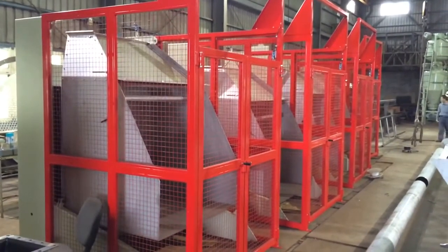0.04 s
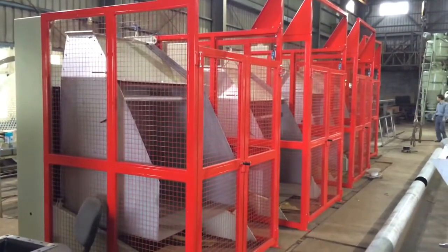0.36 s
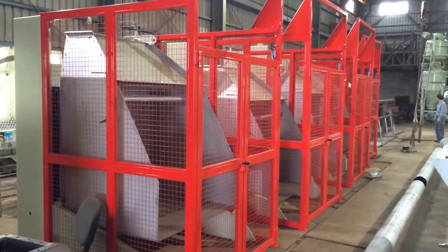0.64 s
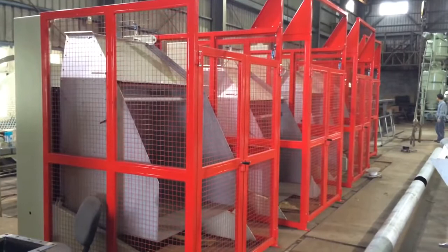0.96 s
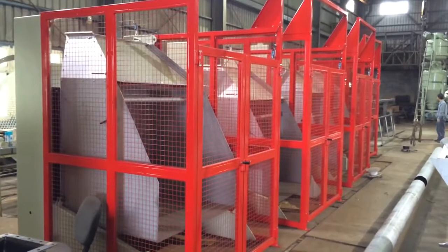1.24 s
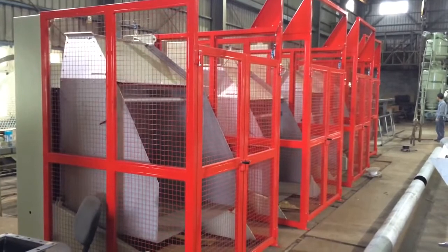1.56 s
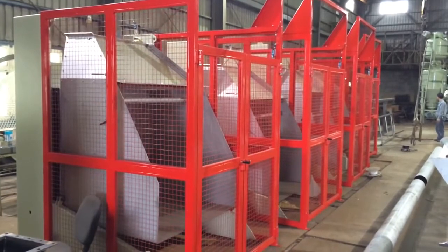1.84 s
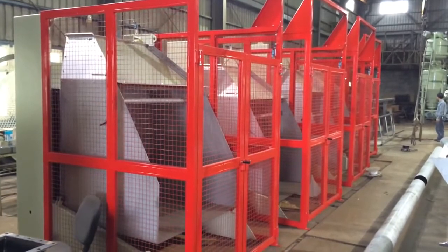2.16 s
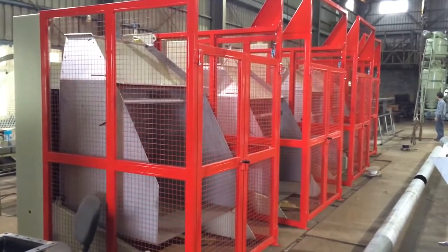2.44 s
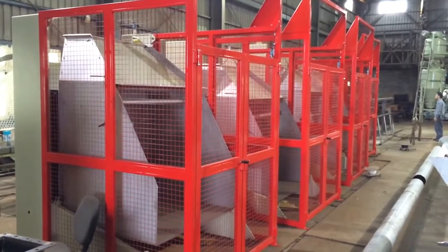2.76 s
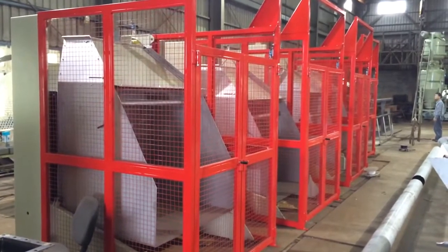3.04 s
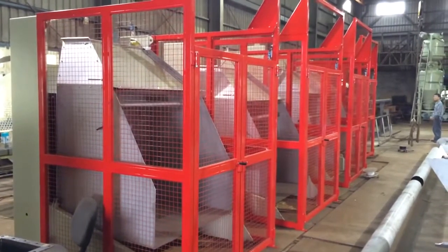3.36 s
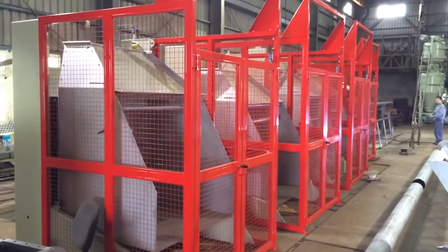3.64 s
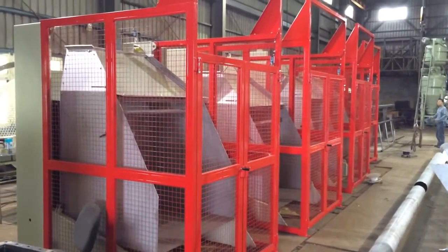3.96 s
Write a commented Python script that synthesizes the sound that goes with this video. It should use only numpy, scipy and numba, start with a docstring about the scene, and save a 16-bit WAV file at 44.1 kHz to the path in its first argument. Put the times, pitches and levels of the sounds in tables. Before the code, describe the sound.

Heavy bangs on a sheet-steel machine casing land right at the start, then at about 1.3, 2.4, 3.1 and 3.9 seconds, each ringing and echoing through a large factory hall. A thin metal ring swells near 0.5 seconds, and a lighter knock follows at 0.7. Beneath, a faint plant hum ducks with each blow and swells back, while a low drone comes and goes.

```python
"""Heavy blows strike the sheet-steel casing of a caged machine and ring through a large factory hall. A brief
low thump opens each blow, and each impact excites the casing's normal modes; reverberation prolongs the sound,
the treble dying first. A lighter knock, two ticks and thin metal rings fall between the blows, over the hum of
the plant and an intermittent low drone. An automatic gain control compresses each blow, so the hum ducks and
swells back."""
import sys
import numpy as np
from scipy import signal
from scipy.fft import rfft, irfft
from scipy.io import wavfile
from scipy.ndimage import uniform_filter1d
from numba import njit

SR = 44100
rng = np.random.default_rng(int(sys.argv[2]) if len(sys.argv) > 2 else 0)


def int16_out(signal):
    """Quantize to a 16-bit WAV file."""
    q = np.round(np.clip(np.atleast_2d(signal).T, -1, 1) * 32767)
    wavfile.write(sys.argv[1], SR, q.astype(np.int16))


N = 176400

# Levels in the tables are relative; sigma is the standard deviation of a Gaussian envelope.
# Blows on the casing: t/s, level/dB, spectral tilt/(dB per octave), thump level/dB
BLOW_EVENTS = [(-.045, 1.5, -0.5, -22), (1.3209, -1.5, 0.34, -10), (2.3852, 1, -0.1, -3.5),
               (3.095, 2, -0.5, -5), (3.8614, -0.5, -0.4, -36)]
# Strong normal modes of the casing: f/Hz, level/dB, T60/s
CASING_MODES = [(317, -27.5, 2.2), (397.4, -23, 1.95), (744, -23.5, 2.4), (950, -19.5, 1.9),
                (1127, -18.5, 1.3), (1155, -17, 2.46), (1233, -20.5, 1.87), (1323, -12.5, 2.06),
                (1427, -19.5, 1.3), (1457, -21.5, 2.5), (1525, -12.5, 1.9), (1605, -7, 0.24),
                (1590, -15.5, 2), (1690, -25, 1.8), (1913, -19, 2.9), (2066, -23, 1.1), (2231, -15, 2.43),
                (2302, -14.5, 1.6), (2355, -19, 2.7), (2730, -22.5, 2.2), (3200, -16, 1.5),
                (3680, -23.5, 2.54), (3890, -19.5, 1.4), (4560, -11.5, 0.36), (4870, -15, 0.8)]
# Spectral density of a blow's crash: f/Hz, level/dB
BLOW_SPECTRUM = [(60, -52), (150, -20.5), (300, -16), (480, -15), (600, -6.5), (900, -5.5), (1300, 0),
                 (1800, -1), (2450, 1), (3000, -1), (3450, -2.5), (3850, 0.5), (4800, -2.5), (5600, -4),
                 (6500, -5), (9500, -12.5), (15000, -20.5)]
# Spectral density of a blow's bright direct sound: f/Hz, level/dB
BITE_SPECTRUM = [(1500, -37), (3400, -14), (4650, 3.5), (5800, -6), (9000, -15), (15000, -19)]
# Partials of the brief low thump at the start of each blow: f/Hz, level/dB, lag/s, sigma/s
THUMP_PARTIALS = [(64, -12.5, 0.018, 0.011), (99, -7.5, 0.021, 0.0066), (192, -6.5, 0.011, 0.0063),
                  (293, -7.5, 0.018, 0.0029), (436, -6, 0.01, 0.0046), (575, -3.5, 0.0063, 0.0068)]
# Reverberation time of the hall: f/Hz, T60/s
HALL_DECAY = [(150, 5), (600, 2.11), (1300, 2.09), (2500, 1.95), (4500, 1.36), (7500, 0.96), (11000, 0.67),
              (15000, 0.27)]
# The knock and the two ticks: t/s, level/dB, spectral tilt/(dB per octave)
KNOCK_EVENTS = [(0.7443, -21.5, -0.5), (.99, -61, 4.5), (2.962, -45.5, 3)]
# Spectral density of a knock: f/Hz, level/dB
KNOCK_SPECTRUM = [(100, -21), (500, 0), (1100, 8), (2000, 1.5), (3200, 0), (4400, 4.5), (6000, -0.5),
                  (10000, -7), (15000, -9.5)]
# Thin rings of metal: peak t/s, sigma/s, f/Hz, level/dB
RING_SWELLS = [(0.51, .06, 2400, -15.5), (0.78, 0.16, 2624, -28), (0.51, 0.087, 1700, -20),
               (0.506, 0.064, 744, -23.5)]
# Swells of the low drone: peak t/s, sigma/s, f/Hz, level/dB
DRONE_SWELLS = [(0.29, 0.069, 268, -22.5), (0.932, 0.015, 213, -28), (0.987, .018, 214, -25.5),
                (1.046, 0.017, 214.2, -27), (1.167, 0.018, 205, -23), (1.26, .035, 210, -39),
                (2.05, 0.15, 183, -41.5), (3.72, 0.14, 215.7, -36), (3.98, .03, 185.6, -31.5)]
# Line spectrum of the plant's hum: f/Hz, level/dB
HUM_LINES = [(97, -47.5), (400, -55), (1166, -56), (1254, -42), (1326, -45)]
# Spectral density of the plant's rush: f/Hz, level/dB
RUSH_SPECTRUM = [(25, -24), (60, -2), (110, -5), (190, 8.5), (300, -5.5), (650, 2.5), (950, 1),
                 (1250, -1.5), (2400, -3), (4500, -8.5), (7500, -22), (11000, -35), (15000, -41)]


def blows(t, plate_gain):
    """Each blow superposes modal ringing, a crash and a bright bite, with a brief low thump at its start."""
    out = 0
    for start, db, tilt_db, thump_db in BLOW_EVENTS:
        age = t - start
        ring = undb(-3.5) * casing_ring(t, age)
        body = undb(-2.5) * crash(age, BLOW_SPECTRUM, tilt_db, plate_gain,
                                  rise_s=0.0019, hold_s=0.14, early_db=-15, early_s=0.005)
        bite = undb(-6.5) * direct_bite(age)
        out += (age >= 0) * (undb(db) * (ring + body + bite) + undb(thump_db) * low_thump(age))
    return out


def casing_ring(t, age, echo_db=-6.5, echo_lag_s=0.19, echo_sigma_s=0.03):
    """Damped normal modes decay exponentially; reflection from the far walls returns them as a swell."""
    decay_s = decay_time(np.maximum(age, 0), hold_s=0.051)
    ring = sum(undb(db) * wavering_tone(t, hz, width_hz=6, scatter=1.6) * undb(-60 * decay_s / t60)
               for hz, db, t60 in CASING_MODES)
    return ring * (1 + undb(echo_db) * gaussian(age, echo_lag_s, echo_sigma_s))


def crash(age, colour, tilt_db, plate_gain, rise_s, hold_s, early_db, early_s):
    """Overlapping modes of struck steel merge into noise; each band decays at the hall's T60."""
    hz, elapsed = bin_frequencies(), np.maximum(age, 0)
    tilt = undb(tilt_db * np.log2(hz / 2500))
    shape = unit_rms(plate_gain * undb(read_curve(colour, hz))) * tilt
    spectrum = rfft(rng.standard_normal(N)) * shape
    centres_hz = np.geomspace(100, 16000, 18)
    decay_s = decay_time(elapsed, hold_s)
    tail = 0
    for centre, weights in zip(centres_hz, np.eye(len(centres_hz))):
        band = irfft(spectrum * np.interp(hz, centres_hz, weights), N)
        tail += band * undb(-60 * decay_s / read_curve(HALL_DECAY, centre))
    attack = 1 - np.exp(-elapsed / rise_s)
    direct_boost = 1 + undb(early_db) * np.exp(-elapsed / early_s)
    return tail * attack * direct_boost


def plate_response(depth_db=2, spacing_hz=26):
    """Many weak plate resonances ripple the frequency response that all the impacts share."""
    ripple = rng.standard_normal(N // 8)
    return undb(depth_db * np.interp(bin_frequencies() / spacing_hz, np.arange(len(ripple)), ripple))


def direct_bite(age, tau_s=0.055):
    """The direct sound of an impact is a broadband transient, bright and exponentially damped."""
    return noise(BITE_SPECTRUM) * np.exp(-np.maximum(age, 0) / tau_s)


def low_thump(age):
    """Staggered wave packets sum to a brief low thump at the start of each blow, falling in pitch."""
    return sum(undb(db) * gaussian(age, lag, sigma) * np.sin(2 * np.pi * (hz * age + rng.random()))
               for hz, db, lag, sigma in THUMP_PARTIALS)


def knocks(t, plate_gain, clack_hz=1330):
    """Lighter metal contacts radiate a dry wave packet, the clack, and a short reverberant crash."""
    out = 0
    for start, db, tilt_db in KNOCK_EVENTS:
        age = t - start
        clack = gaussian(age, peak_s=0.0053, sigma_s=0.001) * np.sin(2 * np.pi * clack_hz * age)
        body = crash(age, KNOCK_SPECTRUM, tilt_db, plate_gain,
                     rise_s=0.0032, hold_s=0.016, early_db=2.5, early_s=0.03)
        out += undb(db) * (body + undb(10.5) * clack)
    return out


def metal_rings(t):
    """Narrow resonances of metal sound as thin tones that swell and fade."""
    return swells(t, RING_SWELLS, width_hz=22, scatter=1.2)


def drone(t):
    """Amplitude modulation: a low narrow-band drone comes and goes."""
    return swells(t, DRONE_SWELLS, width_hz=20, scatter=0.42)


def plant(t):
    """Stationary factory noise: a continuous spectrum, the rush, under a line spectrum, the hum."""
    rush = undb(-35.5) * noise(RUSH_SPECTRUM)
    hum = sum(undb(db) * wavering_tone(t, hz, width_hz=3, scatter=0.38) for hz, db in HUM_LINES)
    return rush + hum


def swells(t, table, width_hz, scatter):
    """Superposition of wavering tones under Gaussian envelopes."""
    return sum(undb(db) * gaussian(t, peak, sigma) * wavering_tone(t, hz, width_hz, scatter)
               for peak, sigma, hz, db in table)


def wavering_tone(t, hz, width_hz, scatter):
    """Interference of reflections makes a sinusoid waver in amplitude and phase."""
    in_phase, quadrature = (scatter * np.interp(t * width_hz * 4, np.arange(1024), draws)
                            for draws in rng.standard_normal((2, 1024)))
    phase = 2 * np.pi * (hz * t + rng.random())
    return ((1 + in_phase) * np.cos(phase) + quadrature * np.sin(phase)) / np.hypot(1, scatter)


def decay_time(elapsed, hold_s, knee_s=0.02):
    """Time spent in reverberant decay, which is held back while the reflections build up."""
    return knee_s * (np.logaddexp(0, (elapsed - hold_s) / knee_s) - np.logaddexp(0, -hold_s / knee_s))


def noise(colour):
    """White noise filtered to a given spectral shape, rms 1."""
    return unit_rms(irfft(rfft(rng.standard_normal(N)) * undb(read_curve(colour, bin_frequencies())), N))


def gaussian(t, peak_s, sigma_s):
    """Bell-shaped envelope of height 1."""
    return np.exp(-0.5 * ((t - peak_s) / sigma_s) ** 2)


def read_curve(table, hz):
    """Interpolation of (f/Hz, value) points on a logarithmic frequency axis."""
    points_hz, values = np.array(table, float).T
    return np.interp(np.log(hz), np.log(points_hz), values)


def bin_frequencies():
    """Frequencies of an N-point spectrum, floored at 1 Hz."""
    return np.maximum(np.arange(N // 2 + 1) * SR / N, 1)


def unit_rms(x):
    """Normalisation to rms 1."""
    return x / np.sqrt(np.mean(x ** 2))


def undb(db):
    """Decibels to amplitude ratio."""
    return 10 ** (np.asarray(db) / 20)


@njit
def peak_envelope(level, release_s):
    """Peak detection: the envelope rises at once and relaxes exponentially."""
    out, held = np.empty(len(level)), 0.
    for i in range(len(level)):
        held = max(level[i], held + (level[i] - held) / (release_s * SR))
        out[i] = held
    return out


def scene():
    """Linear superposition of all the sources in one channel."""
    t, plate_gain = np.arange(N) / SR, plate_response()
    return (blows(t, plate_gain) + knocks(t, plate_gain) + drone(t) + metal_rings(t) + plant(t))[None]


def record(dry):
    """Look-ahead compression holds the blows down; saturation rounds peaks and a low-pass cuts the top."""
    threshold_db, ratio, makeup_db = -14.5, 4.17, 1
    window_s, lookahead_s, cutoff_hz = 0.0027, 0.004, 15250
    pressure, samples = dry[0], np.arange(N)
    rms = np.sqrt(np.abs(uniform_filter1d(pressure ** 2, int(window_s * SR))))
    envelope = np.interp(samples + lookahead_s * SR, samples, peak_envelope(rms, release_s=0.36))
    gain = np.minimum(1, undb(threshold_db) / envelope) ** (1 - 1 / ratio)
    rounded = np.tanh(pressure * gain * undb(makeup_db))
    lowpass = signal.ellip(10, 0.2, 80, cutoff_hz, fs=SR, output="sos")
    return signal.sosfilt(lowpass, rounded)[None]


dry = scene()
out = record(dry)
int16_out(out)
```